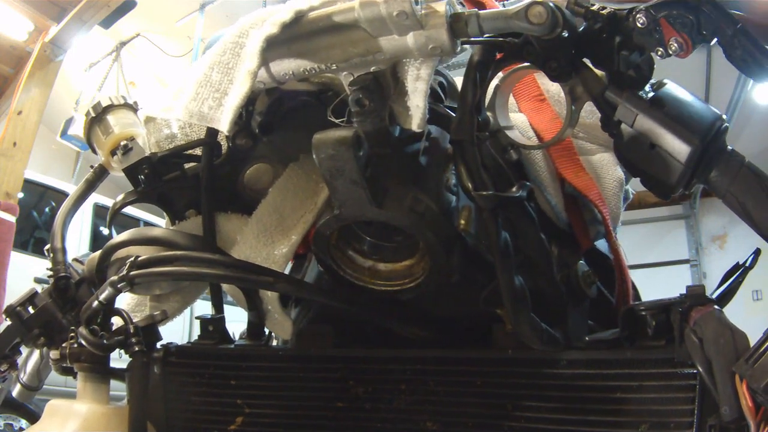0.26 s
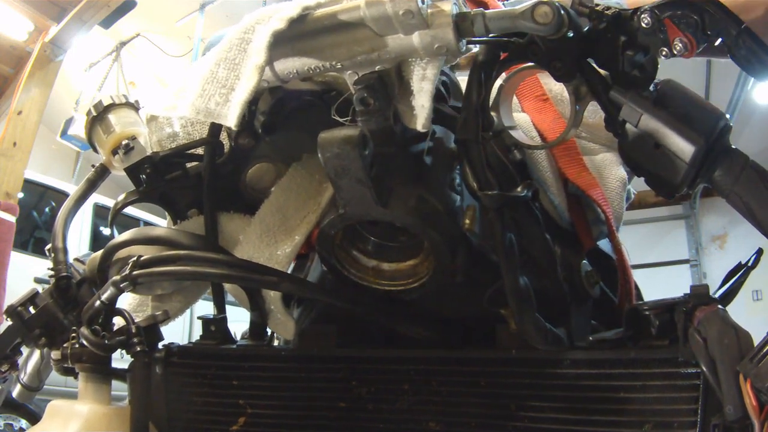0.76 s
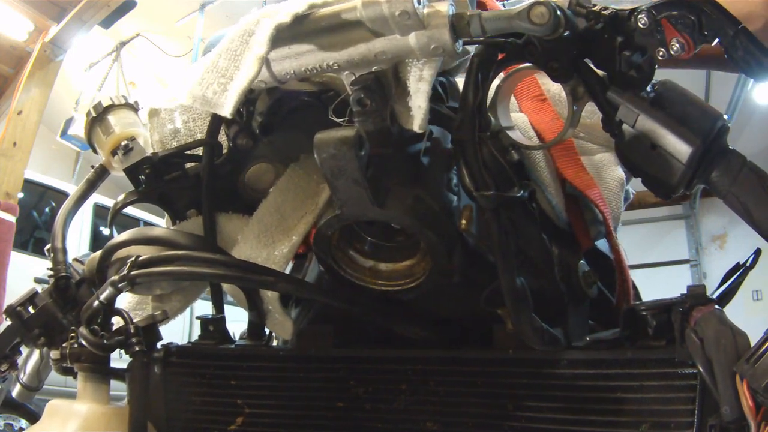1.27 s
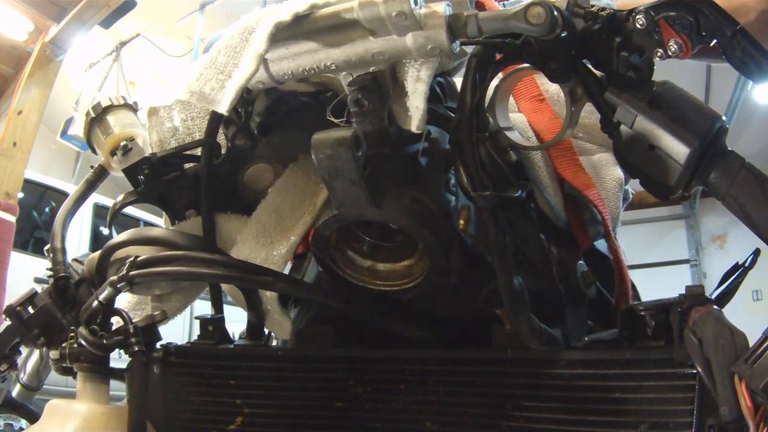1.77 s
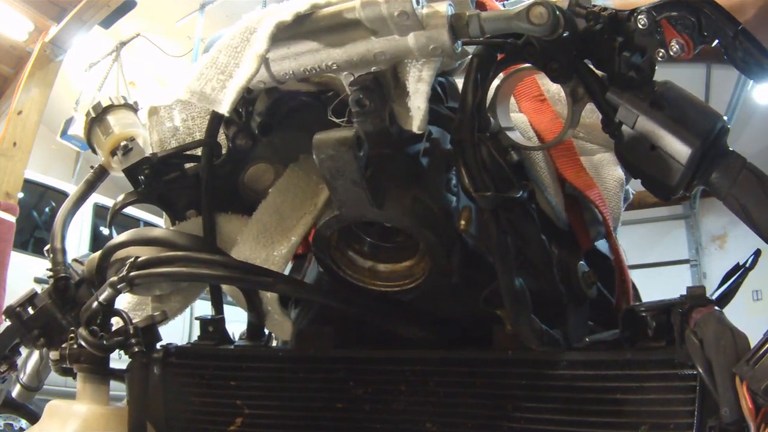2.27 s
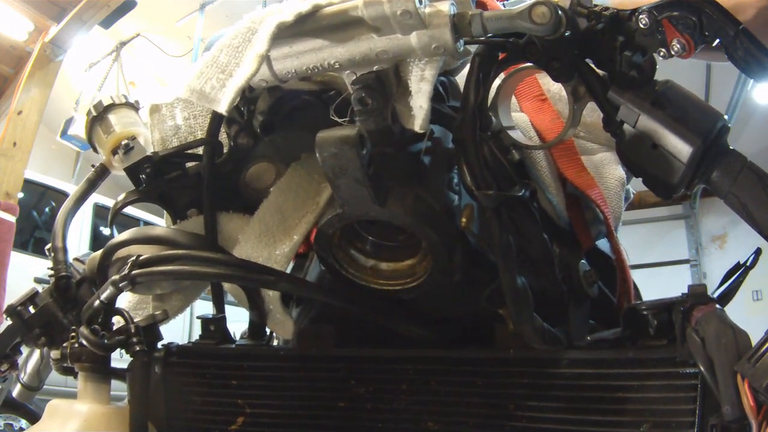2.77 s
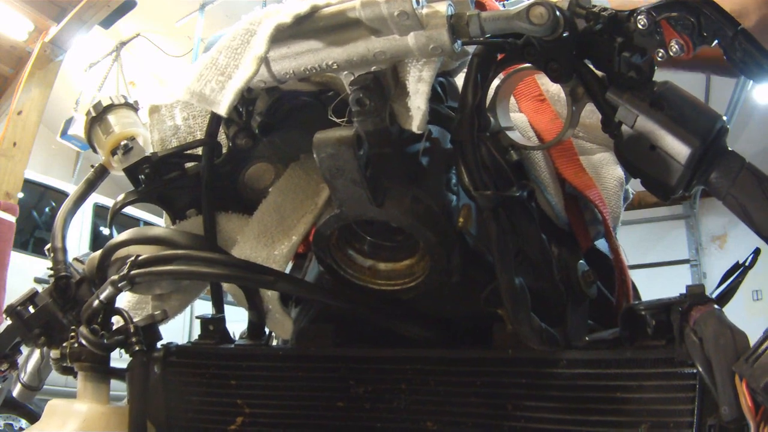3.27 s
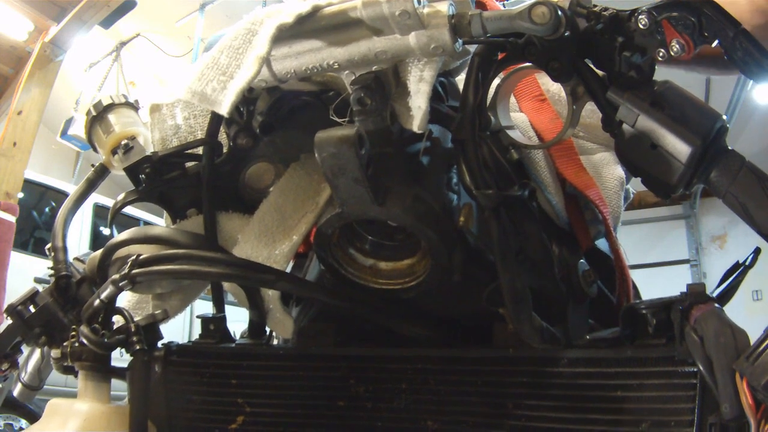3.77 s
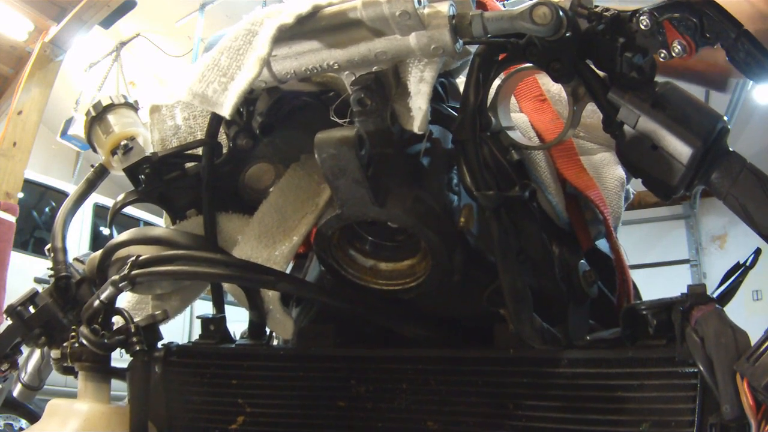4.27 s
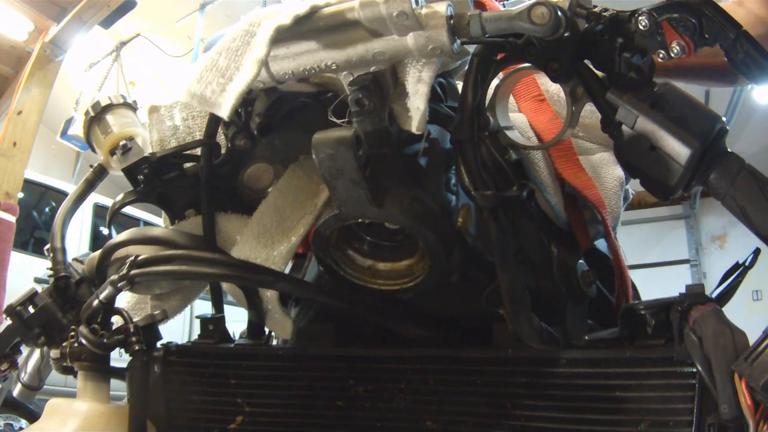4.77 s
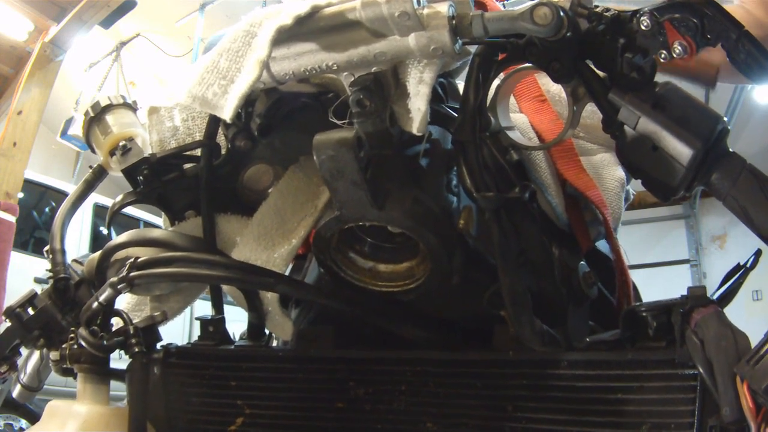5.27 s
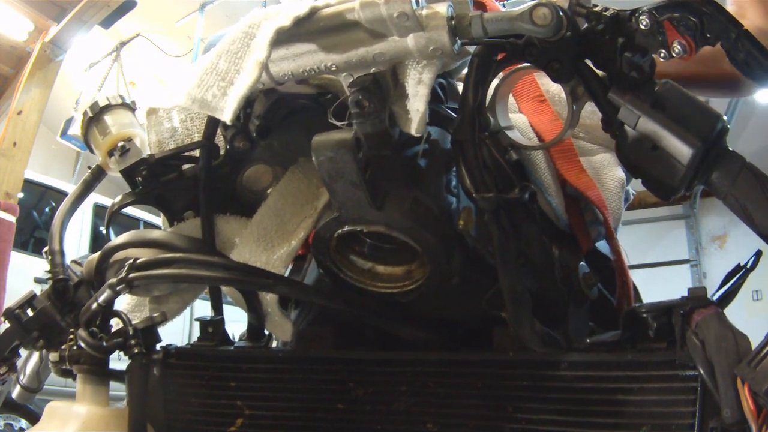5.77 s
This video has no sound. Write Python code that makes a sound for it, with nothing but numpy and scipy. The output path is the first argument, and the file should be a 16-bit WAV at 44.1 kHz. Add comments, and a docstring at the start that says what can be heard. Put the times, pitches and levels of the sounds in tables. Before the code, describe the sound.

A hammer taps a steel punch lightly three times, then drives it against an engine with eleven steady, ringing blows in a garage.

```python
"""Hammer and punch on an engine

In a garage, a hammer drives a long steel punch against an engine: three light placing taps, then
eleven blows. Each blow thuds through the engine, rattles its loose parts, cracks at the steel faces
and makes the punch ping. The garage answers with near reflections, a short tail and a slap echo.
The level ducks at the first hard blow and stays down. Faint air, hum and rumble lie underneath."""
import sys
import numpy as np
from scipy import signal
from scipy.fft import rfft, irfft, next_fast_len
from scipy.io import wavfile

SR = 44100
rng = np.random.default_rng(int(sys.argv[2]) if len(sys.argv) > 2 else 0)


def persist_wave(psi):
    """Save psi, clipped to +-1, as 16-bit WAV."""
    counts = np.round(np.clip(psi, -1, 1) * 32767).astype(np.int16)
    wavfile.write(sys.argv[1], SR, np.atleast_2d(counts).T)


N = 264820

# The bed of room air and hiss. Each row: frequency in Hz, noise density in dB.
ROOM_AIR = [(41, -41.5), (70, -30), (90, -63), (124, -36), (145, -2.5), (268, -4.5), (300, -2), (422, -3),
            (462, -5.5), (872, -9.5), (2600, -16), (14600, -23.5), (16000, -42.5)]
# The low rumble. Each row: frequency in Hz, noise density in dB.
LOW_RUMBLE = [(8, 14), (25, 12.5), (45, 8), (80, 6), (160, -50), (400, -120)]
# Light placing taps. Each row: start in seconds, level in dB, strongest pitch in Hz,
# roll-off above it in dB per octave.
PLACING_TAPS = [(0.608, -24.5, 850, 17), (1.107, -11.5, 485, 1.5), (1.9923, -10, 183, 5.5)]
# Modes of the struck engine. Each row: pitch in Hz, level in dB, time to fall 60 dB in seconds.
ENGINE_MODES = [(139.5, -16, 0.13), (179.6, -5, 0.096), (260.4, -5.5, 0.45), (303.8, -1, 0.046),
                (415.7, -5, 0.09), (532.4, -0.5, 0.089), (503.2, 7, 0.016), (753, -29.5, 0.29),
                (851.5, -22.5, 0.21), (996, -16, 0.1), (1155, -21.5, 0.21), (1180, -20, 0.0033),
                (1616, -16.5, 0.045), (433, -37, 1.33)]
# Small engine parts rattling. Each row: frequency in Hz, noise density in dB.
CLATTER_COLOUR = [(350, -23), (700, 2.5), (1000, 4.5), (1400, -2), (1700, -6), (2200, -11.5), (3500, -21.5),
                  (6000, -56.5)]
# Nearby surfaces. Each row: delay in seconds, level in dB, treble cutoff in Hz.
NEAR_SURFACES = [(.00644, -4, 1983), (.00882, -3, 443), (0.017, -18, 2540)]
# Slap off the far end of the garage. Each row: delay in seconds, level in dB, treble cutoff in Hz.
FAR_SURFACES = [(0.0606, -10, 2445), (.0636, -18.5, 445)]
# Length of the garage's tail. Each row: frequency in Hz, time to fall 60 dB in seconds.
TAIL_DECAY = [(130, 0.48), (400, 0.35), (1200, 0.41), (3500, 0.44), (8000, 0.43), (15000, 0.34)]
# Tone of that tail. Each row: frequency in Hz, gain in dB.
TAIL_COLOUR = [(100, -1), (170, -7.5), (300, 4), (600, 1), (1300, 8.5), (3000, 0.5), (6100, -1),
               (7250, -8.5), (9000, -2.5), (15000, -12.5)]
# Hard blows. Each row: start in seconds, then engine thud, loose-part rattle and steel ring,
# each in dB against an ordinary blow.
HARD_BLOWS = [(2.377, 2.5, 6.5, -4), (2.7239, 1, 0.5, 2.5), (3.0544, .2, -1, -6.5), (3.4, 0.6, 1.5, -6.5),
              (3.7395, -0.2, 1.5, 0.5), (4.0878, -.5, 0.9, -0.2), (4.4303, -1.3, 0.2, -4),
              (4.7796, -1.5, 0, 2.5), (5.1270, -3.5, 2.5, 3.5), (5.4821, -7, -1.2, 4.5),
              (5.8268, -11, -5, 2.1)]
# The engine's middle modes follow the thud most closely. Each row: frequency in Hz,
# gain in an ordinary blow in dB, dB gained per dB of thud.
THUD_DRIVE = [(199, -2.5, 0.36), (367, 0.14, 1.29), (540, 0.66, .9), (1200, 0, .5)]
# A loose part snapping back. Each row: frequency in Hz, noise density in dB.
SNAP_COLOUR = [(300, -39), (750, -2), (1250, 4), (1650, -10), (2150, -2), (3000, -9), (4300, -16),
               (8000, -34.5)]
# Steel hitting steel. Each row: frequency in Hz, noise density in dB.
CRACK_COLOUR = [(600, 3.5), (1200, -3), (1800, -6.5), (2500, -2.5), (3800, 1.5), (5000, -7), (6200, 1.5),
                (7300, -9), (8500, -0.5), (10000, 2), (12000, -8.5), (15000, -9.5)]
# Resonances of the punch. Each row: pitch in Hz, width in Hz, level in dB.
PUNCH_MODES = [(6060, 250, -12), (7220, 110, 11.5), (7330, 160, 4), (9540, 430, -21), (9700, 200, -8.5)]


def amp(db):
    """Decibels to gain."""
    return 10 ** (np.asarray(db) / 20)


def along(points, hz):
    """A curve of (Hz, value) points, read on a log frequency axis."""
    freqs, values = np.transpose(points)
    return np.interp(np.log(hz + 1), np.log(freqs + 1), values)


def filtered(x, response):
    """x through a complex frequency response."""
    size = next_fast_len(len(x) + SR // 10, real=True)
    return irfft(rfft(x, size) * response(np.fft.rfftfreq(size, 1 / SR)), size)[:len(x)]


def coloured(x, points, size=4096):
    """x through a minimum-phase EQ of (Hz, dB) points, so nothing sounds ahead of the hit."""
    cepstrum = irfft(np.log(amp(along(points, np.fft.rfftfreq(size, 1 / SR)))))
    folded = np.r_[cepstrum[0], 2 * cepstrum[1:size // 2]]
    impulse = irfft(np.exp(rfft(folded, size)))
    return signal.oaconvolve(x, impulse)[:len(x)]


def noise(spectrum, size):
    """Coloured noise of rms 1."""
    x = filtered(rng.standard_normal(size), lambda hz: amp(along(spectrum, hz)))
    return x / np.sqrt(np.mean(x ** 2) + 1e-20)


def add(out, start_s, sound):
    """Mix a sound into out at its start time."""
    out[round(start_s * SR):][:len(sound)] += sound


def room_tone(air_db=-62, hum_db=-72, whine_db=-84):
    """Quiet air and hiss with a faint mains hum and a thin electronic whine."""
    hum, whine = np.sqrt(2) * np.sin(2 * np.pi * np.outer([120, 5120], np.arange(N) / SR))
    return amp(air_db) * noise(ROOM_AIR, N) + amp(hum_db) * hum + amp(whine_db) * whine


def tap(thud, t, level_db, centre_hz, fall_db_per_oct, rise_db_per_oct=19.5):
    """A light tap wakes one region of the engine's modes and is too soft to ring the steel."""
    body = thud.copy()
    add(body, 0, clatter(t))
    octaves = np.arange(-2, 6)
    gains_db = level_db + np.minimum(rise_db_per_oct * octaves, -fall_db_per_oct * octaves)
    return coloured(body, np.c_[centre_hz * 2. ** octaves, gains_db])


def engine_thud(t, level_db=-6.5):
    """The body of the hit: the engine's modes start in alternating polarity and die away."""
    modes = ((-1) ** k * amp(db - 60 * t / t60) * np.sin(2 * np.pi * hz * t)
             for k, (hz, db, t60) in enumerate(ENGINE_MODES))
    return amp(level_db) * sum(modes)


def low_cut(x):
    """Two high-passes in a row: the hits carry no deep bass."""
    for corner_hz, damping in (128, 0.47), (105, np.sqrt(2)):
        x = filtered(x, lambda hz: -hz ** 2 / (corner_hz ** 2 - hz ** 2 + 1j * damping * hz * corner_hz))
    return x


def clatter(t, level_db=-16.0, t60=0.031, attack_s=0.00084):
    """Brackets and covers add a dense, short rattle."""
    return amp(level_db - 60 * t / t60) * noise(CLATTER_COLOUR, len(t)) * (1 - np.exp(-t / attack_s))


def echoes(x, surfaces):
    """The sound plus a late, dulled copy off each surface."""
    def reflections(hz):
        return sum(amp(db) * np.exp(-2j * np.pi * hz * delay_s) / (1 + 1j * hz / cutoff_hz)
                   for delay_s, db, cutoff_hz in surfaces)
    return filtered(x, lambda hz: 1 + reflections(hz))


def room_tail(hit, standing_waves, split_hz=550, build_s=0.013):
    """A diffuse tail with the hit's colour and energy; its low standing waves repeat from hit to hit."""
    hz, t, lows = signal.stft(standing_waves, SR, nperseg=512)
    highs = signal.stft(rng.standard_normal(len(standing_waves)), SR, nperseg=512)[2]
    wash = np.where(hz[:, None] < split_hz, lows, highs)
    hit_spectrum = np.linalg.norm(signal.stft(hit, SR, nperseg=512)[2], axis=1)
    colour = hit_spectrum * amp(along(TAIL_COLOUR, hz))
    decay = amp(-60 * t / along(TAIL_DECAY, hz)[:, None])
    tail = signal.istft(wash * colour[:, None] * decay, SR, nperseg=512)[1][:len(standing_waves)]
    tail = low_cut(tail) * (1 - np.exp(-np.arange(len(tail)) / SR / build_s))
    return tail * np.linalg.norm(hit) / np.linalg.norm(tail)


def blow(thud, t, thud_db, rattle_db, ring_db):
    """A hard blow layers the engine's thud, its loose parts and the steel of hammer and punch."""
    hit = coloured(thud, [(hz, db + follows * thud_db) for hz, db, follows in THUD_DRIVE])
    loose_parts = low_cut(amp(rattle_db) * clatter(t) + snap(t, rattle_db))
    steel = crack(t, ring_db) + ping(t, ring_db)
    add(hit, 0, loose_parts + steel)
    return hit


def snap(t, rattle_db, level_db=-31.5, growth=2.2, t60=0.036, attack_s=0.0011):
    """A loose part snaps back, growing so steeply with the rattle that only the heaviest blow shows it."""
    decay = amp(level_db + growth * rattle_db - 60 * t / t60)
    return decay * noise(SNAP_COLOUR, len(t)) * (1 - np.exp(-t / attack_s))


def crack(t, ring_db, level_db=-25, chatter_s=0.0033, t60=0.018, after_db=-25, after_t60=0.2):
    """The steel faces chatter for a few milliseconds and leave a weak after-ring."""
    # (Hz, dB): the top sizzle follows the ring more closely than the bite below it
    tilt = [(4500, 0.5 + 0.19 * ring_db), (9000, -0.5 + 0.55 * ring_db)]
    burst = filtered(noise(CRACK_COLOUR, len(t)), lambda hz: amp(along(tilt, hz)))
    chatter = amp(-60 * np.maximum(t - chatter_s, 0) / t60)
    after_ring = amp(after_db - 60 * t / after_t60)
    attack = 1 - np.exp(-t / 0.001)
    return amp(level_db) * burst * (chatter + after_ring) * attack


def ping(t, ring_db, level_db=-19, t60=0.021, attack_s=0.00011):
    """The chatter rings the punch's resonances, which the hand damps quickly."""
    def resonances(hz):
        return sum(amp(db) * 1j * hz * width / (pitch ** 2 - hz ** 2 + 1j * hz * width)
                   for pitch, width, db in PUNCH_MODES)
    envelope = amp(-60 * t / t60) * (1 - np.exp(-t / attack_s))
    ring = filtered(rng.standard_normal(len(t)), resonances) * envelope
    return amp(level_db + ring_db) * ring * np.linalg.norm(envelope) / np.linalg.norm(ring)


def hammering(tail_db=-8.5):
    """The taps, then the blows, each answered by the garage."""
    out = np.zeros(N + SR)
    t = np.arange(SR // 4) / SR
    thud = low_cut(engine_thud(np.arange(SR) / SR))
    standing_waves = rng.standard_normal(SR // 2)
    for stroke, cues in (tap, PLACING_TAPS), (blow, HARD_BLOWS):
        for start_s, *touch in cues:
            hit = stroke(thud, t, *touch)
            add(out, start_s, echoes(hit, NEAR_SURFACES))
            add(out, start_s, amp(tail_db) * room_tail(hit[:len(t)], standing_waves))
    return echoes(out[:N], FAR_SURFACES)


def duck(x, threshold_db=-9, depth_db=7.0, attack_s=0.017):
    """A loud peak pulls the gain down, and it stays down."""
    held_peak_db = 20 * np.log10(np.maximum.accumulate(np.abs(x)) + 1e-9)
    target_db = np.clip(held_peak_db - threshold_db, 0, depth_db)
    pole = np.exp(-1 / (attack_s * SR))
    cut_db = signal.lfilter([1 - pole], [1, -pole], target_db)
    return x * amp(-cut_db)


def scene():
    """The hammering over the room tone, in mono."""
    return (hammering() + room_tone())[None]


def record(dry, rumble_db=-63, top_hz=15700):
    """The final mix: ducked, laid over a steady low rumble, with the very top cut off steeply."""
    mix = duck(dry[0]) + amp(rumble_db) * noise(LOW_RUMBLE, N)
    return filtered(mix, lambda hz: 1 / np.sqrt(1 + (hz / top_hz) ** 120))[None]


dry = scene()
out = record(dry)
persist_wave(out)
```